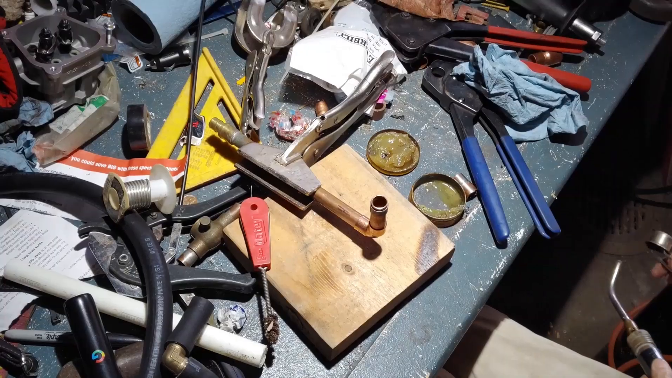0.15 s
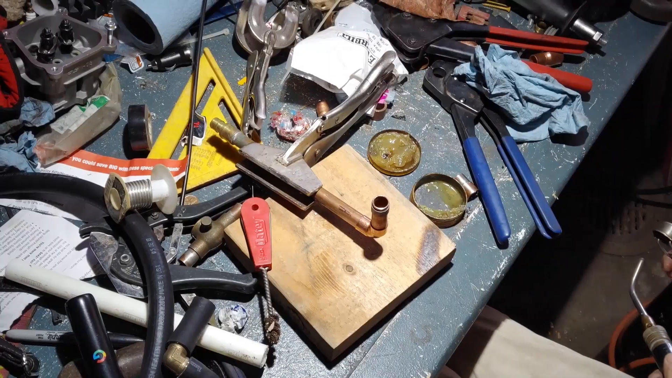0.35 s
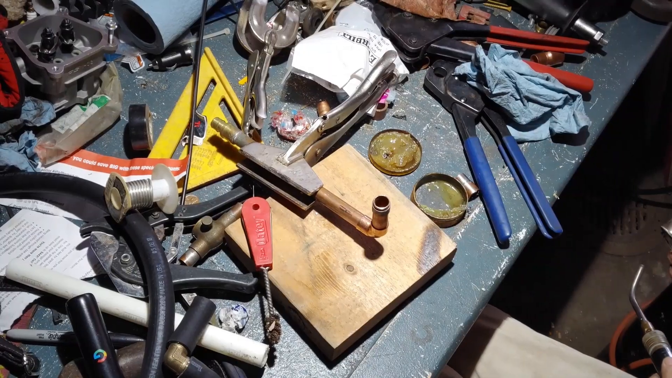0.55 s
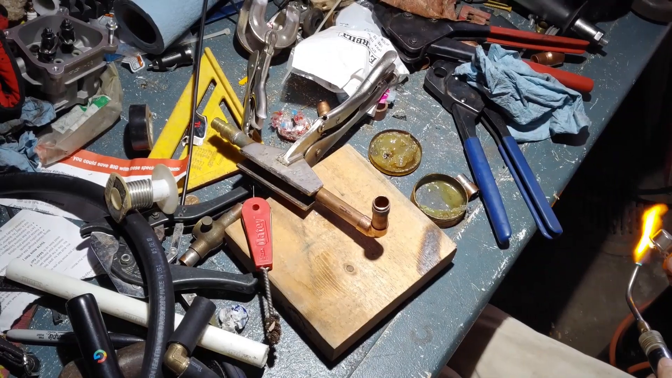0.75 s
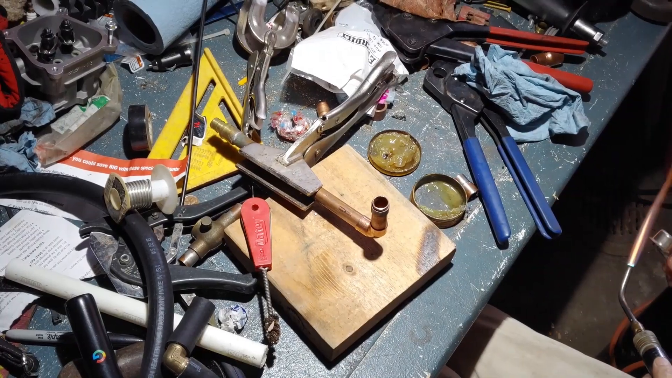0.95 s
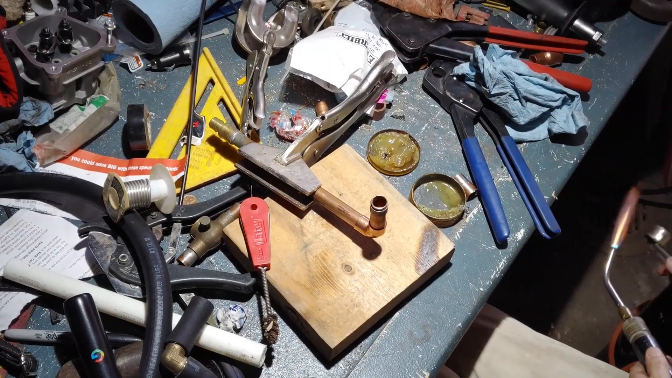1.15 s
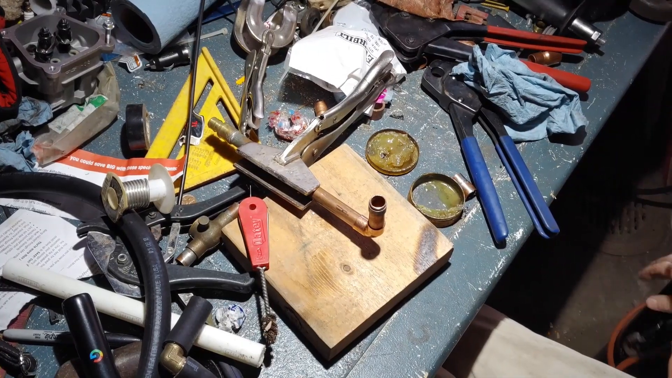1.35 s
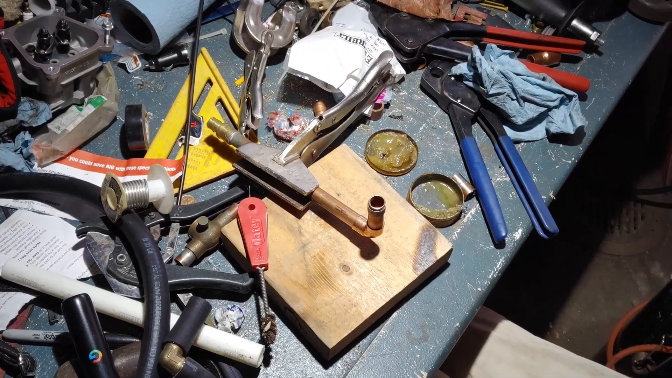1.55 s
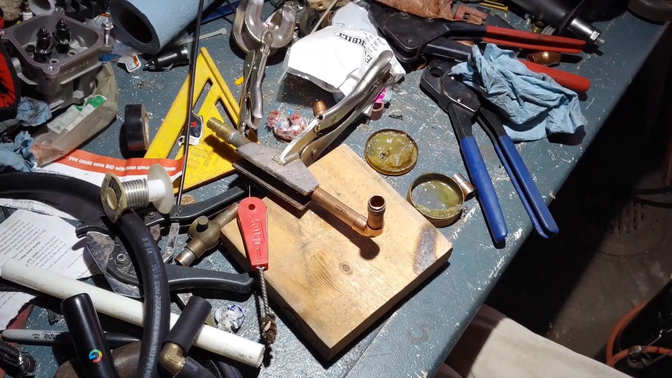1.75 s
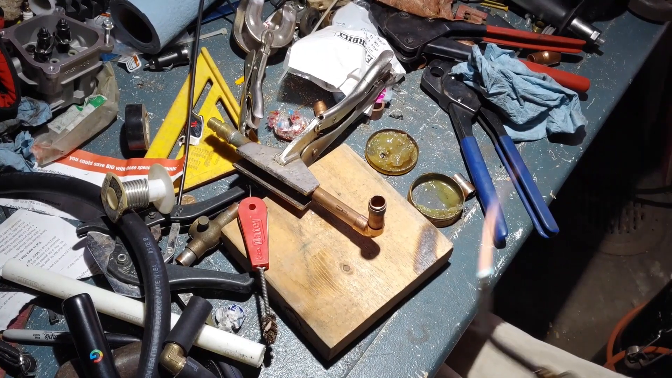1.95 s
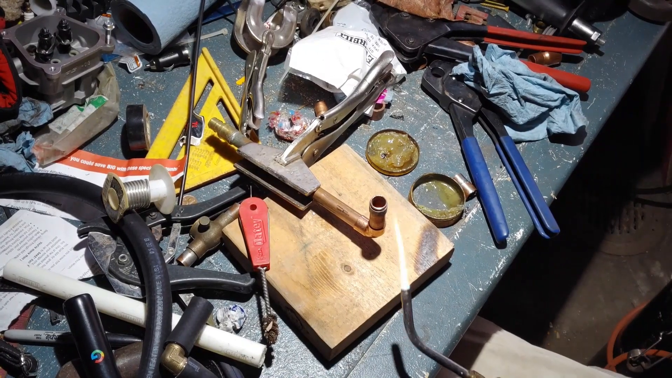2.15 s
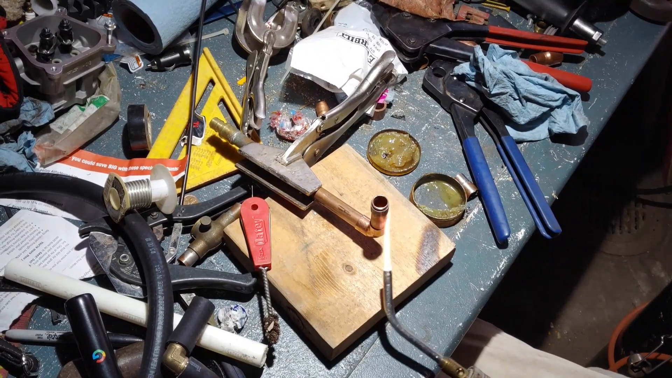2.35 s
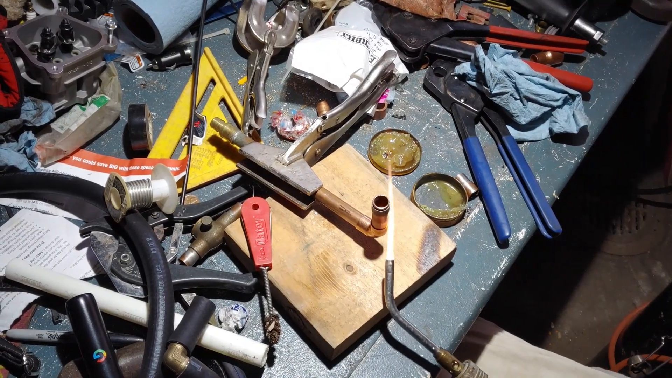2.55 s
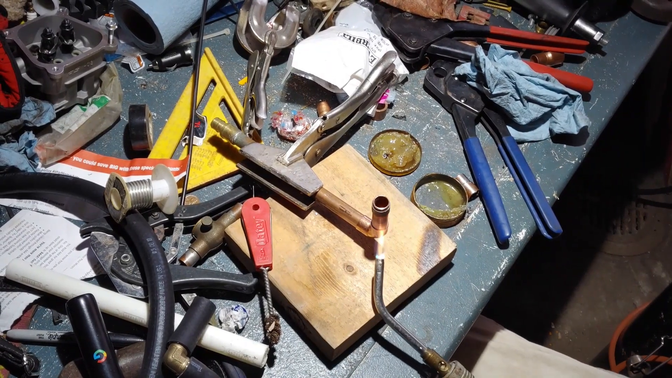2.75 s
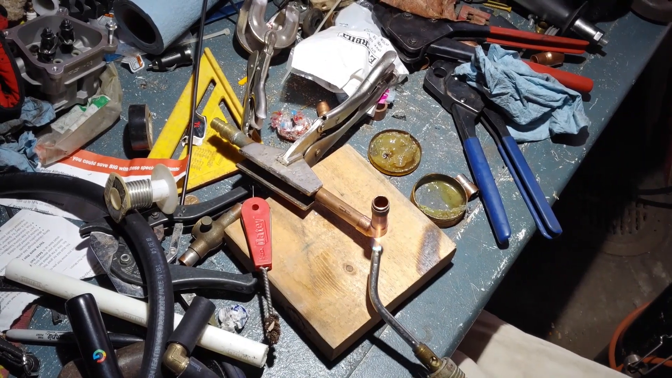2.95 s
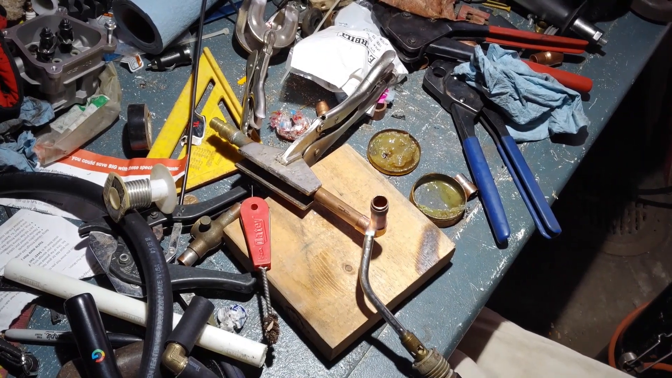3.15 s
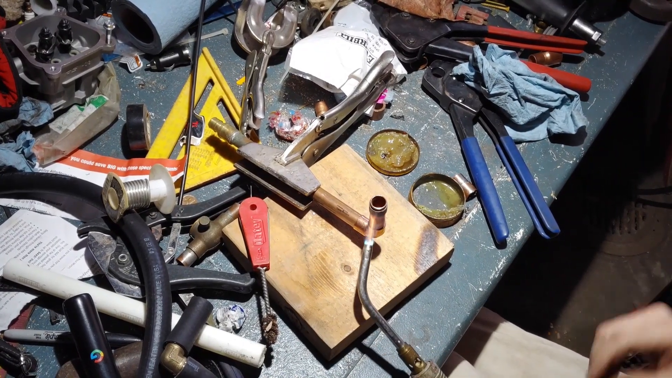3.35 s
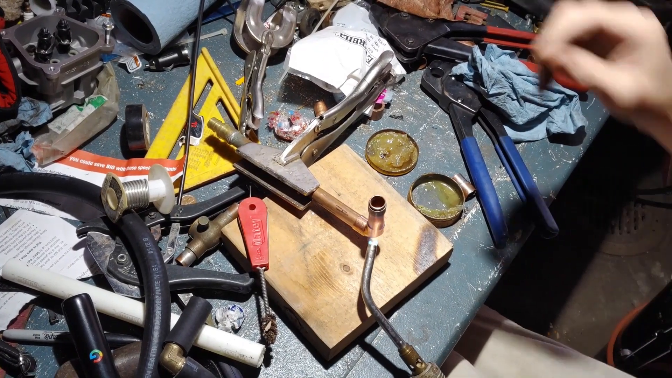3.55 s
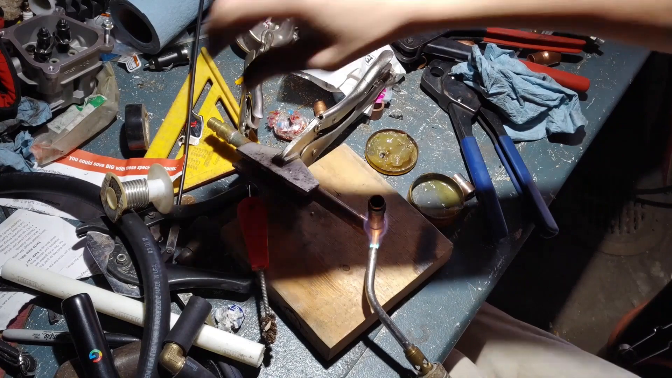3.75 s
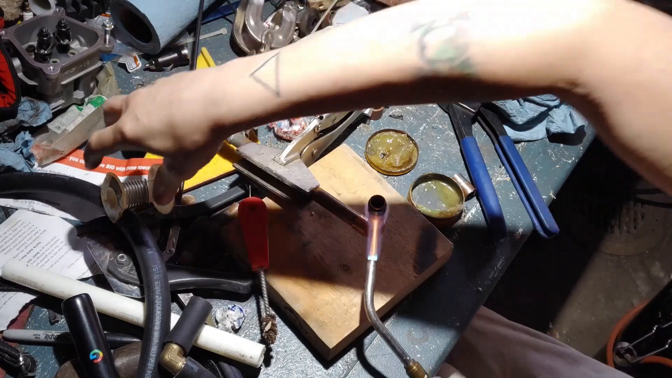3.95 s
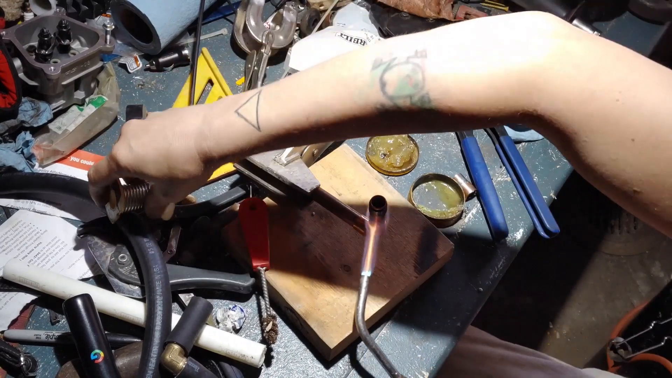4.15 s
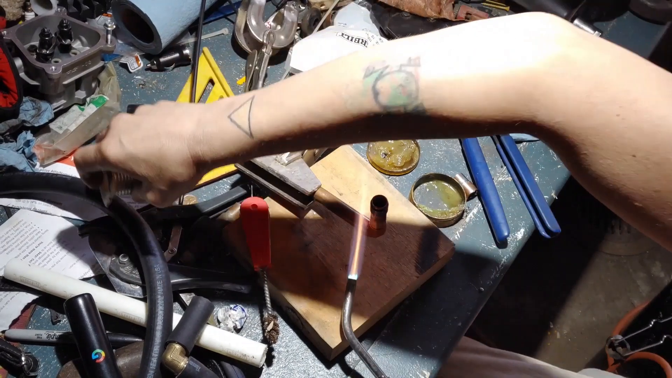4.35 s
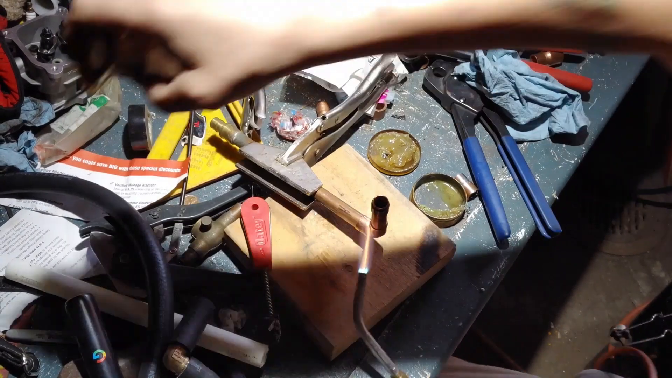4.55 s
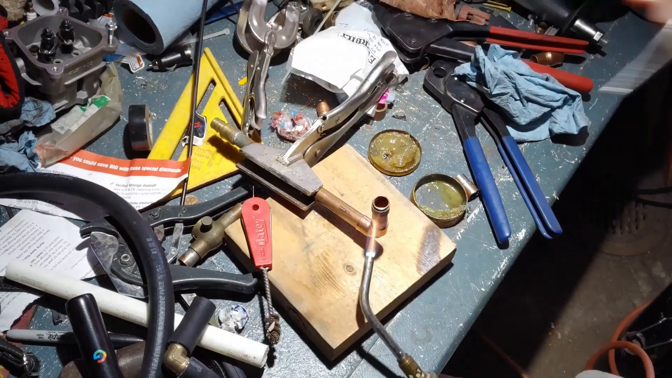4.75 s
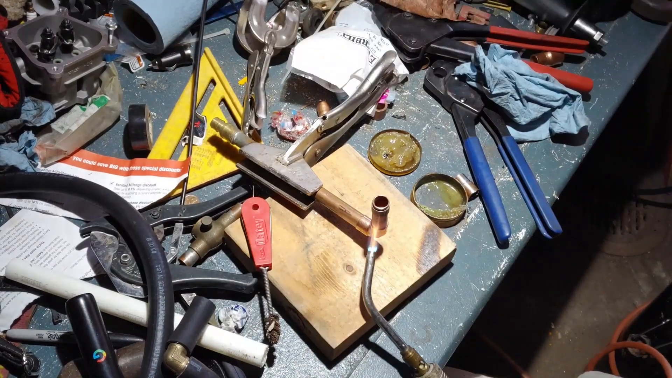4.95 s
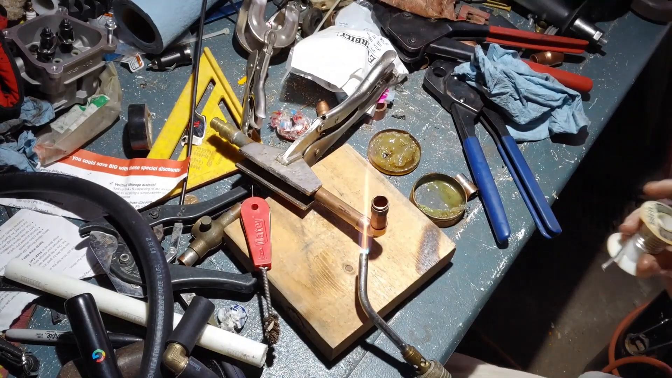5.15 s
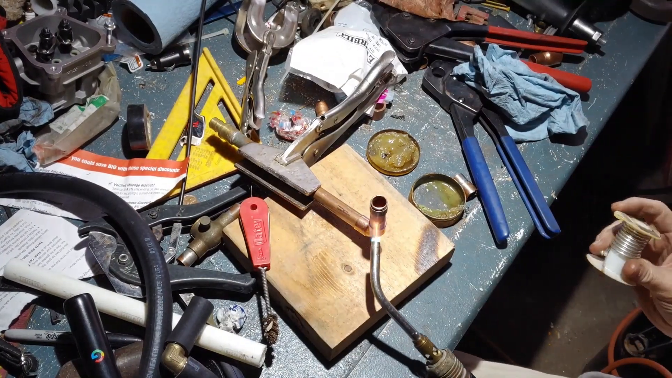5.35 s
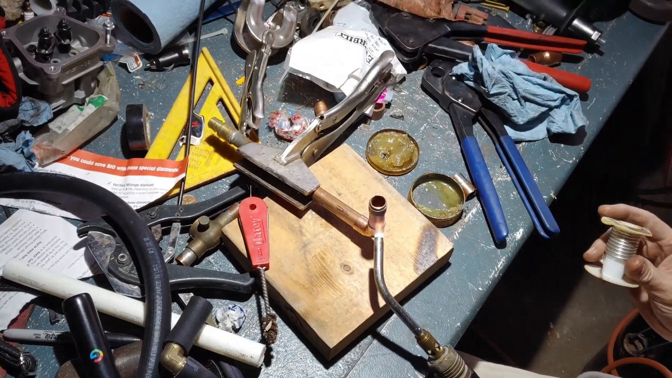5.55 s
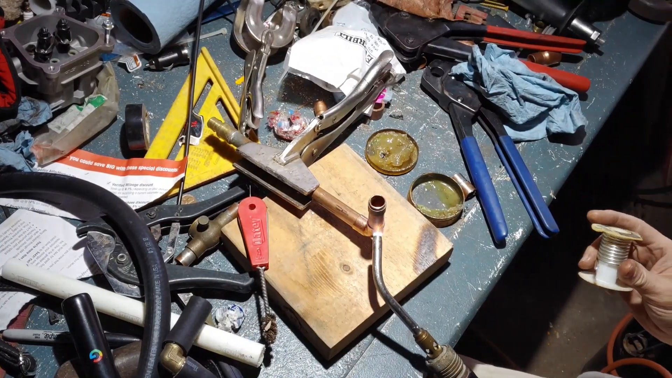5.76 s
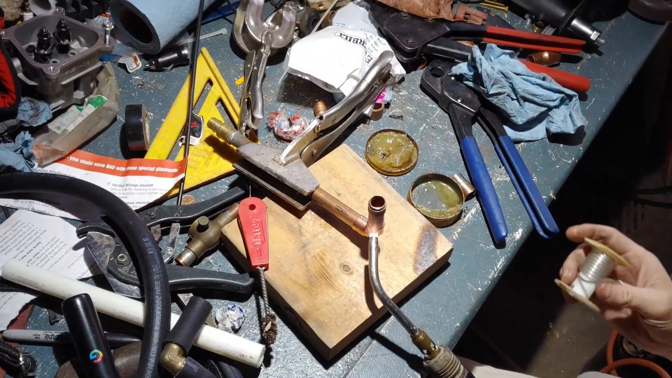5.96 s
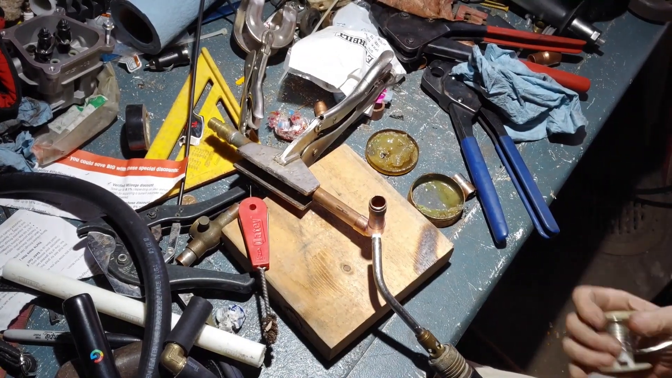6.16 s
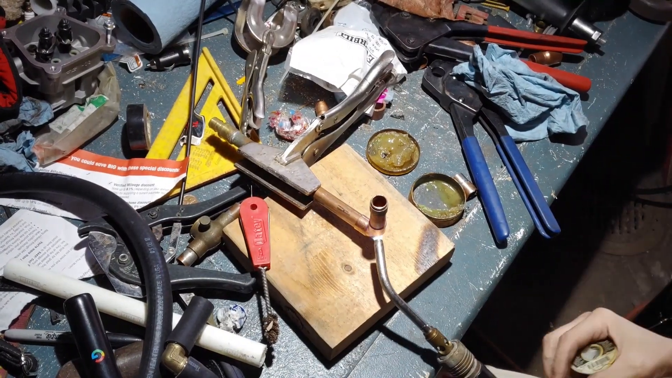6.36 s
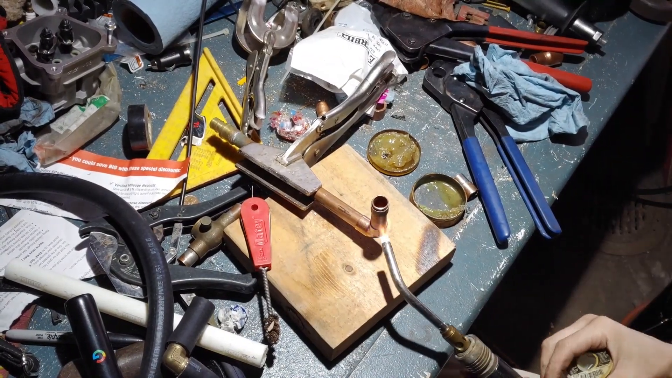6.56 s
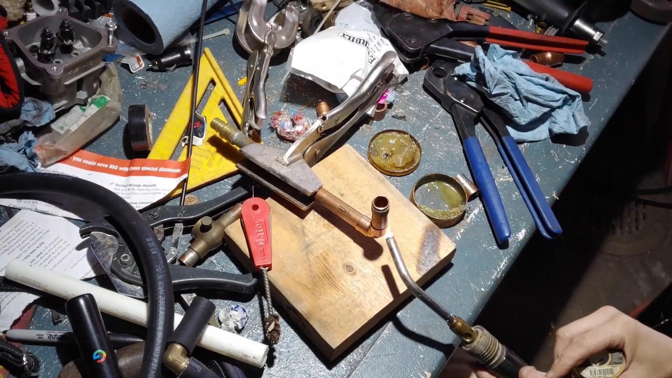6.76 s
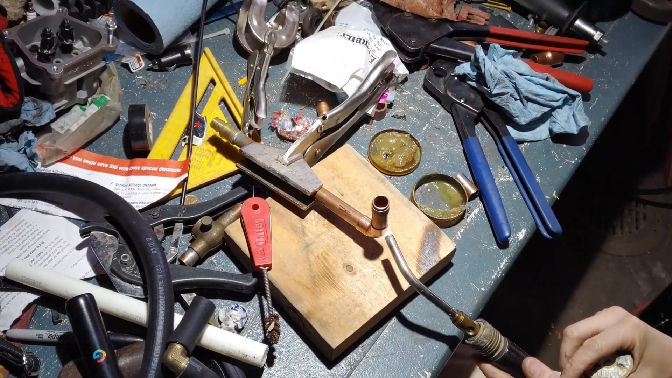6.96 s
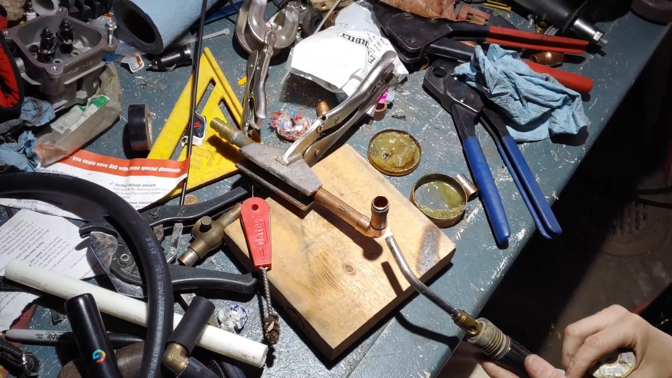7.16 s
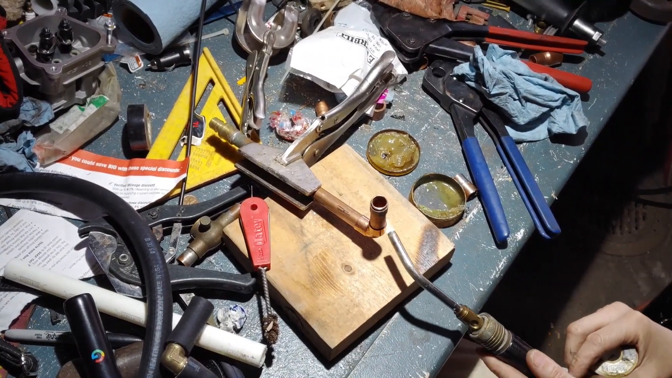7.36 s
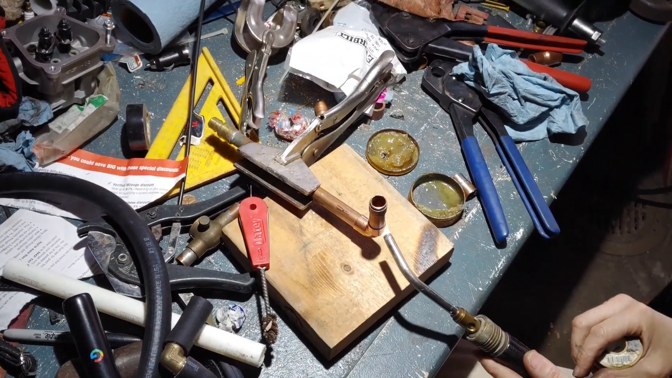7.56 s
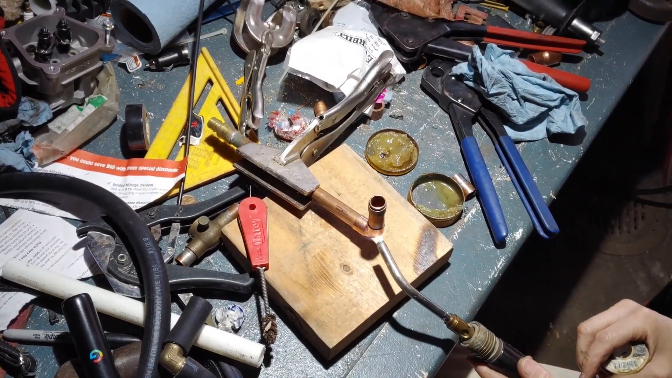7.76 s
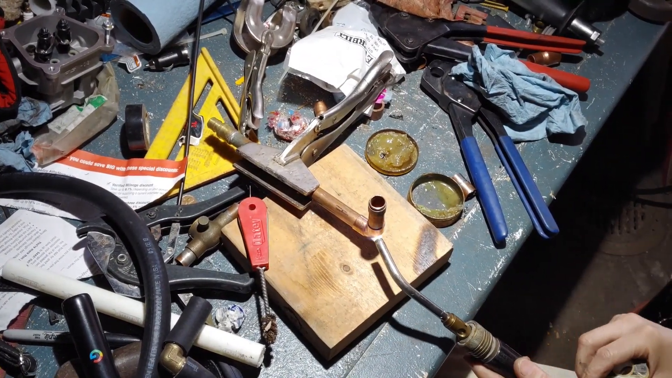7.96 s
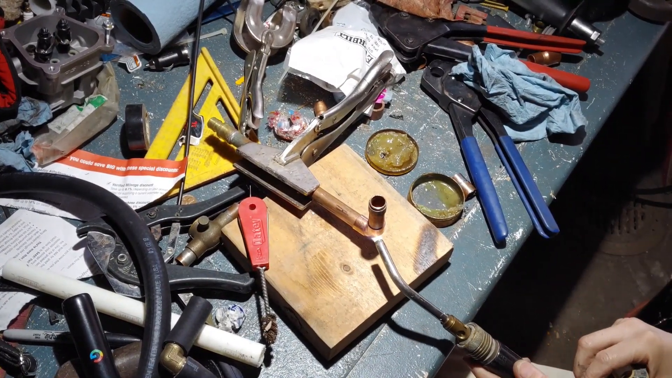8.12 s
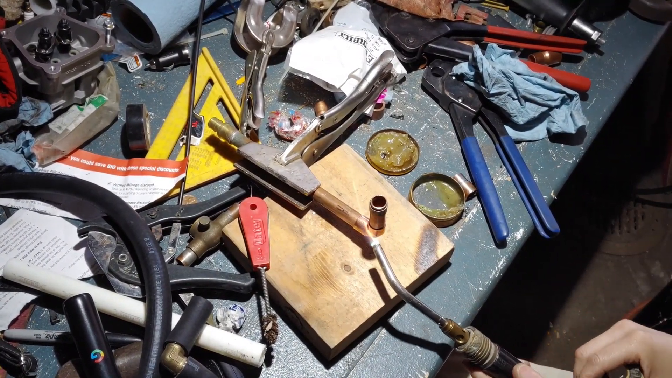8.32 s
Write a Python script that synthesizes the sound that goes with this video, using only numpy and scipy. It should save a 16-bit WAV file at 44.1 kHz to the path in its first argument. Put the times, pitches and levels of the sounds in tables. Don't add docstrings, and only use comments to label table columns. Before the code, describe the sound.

A quiet workshop hums faintly while unlit gas whispers from a hand torch, rising around 0.66 seconds with faint striker touches. At 0.8 a bright metal rasp and gas surge lead into a sharp ignition pop at 0.83, with a low whoosh and short room ring. The young flame hisses leftward, singing in wavering bursts near 2.6 kHz until about 2.4; a metal tick comes at 1.4 and small valve squeaks around 1.3 and 1.5 to 1.7. From 1.8 the torch swings inward, its hiss swelling and shifting in colour. By 3 it is a strong, steady, grainy roar on a copper fitting, with a breathy whistle near 4.3 kHz. A quick double wooden knock lands at 4.4, a bright wire rasp at 4.73, and a soft spool tap at 5.02. The roar continues, gently fluctuating as the nozzle moves, easing near 7 and strengthening until the end at 8.5. Close stereo pickup.

```python
import sys
import numpy as np
from scipy import signal
from scipy.fft import rfft, irfft, next_fast_len
from scipy.io import wavfile
from scipy.ndimage import uniform_filter1d, map_coordinates

SR = 44100
rng = np.random.default_rng(int(sys.argv[2]) if len(sys.argv) > 2 else 0)


def waveform_to_disk(signal):
    frames = np.transpose(np.atleast_2d(signal))
    scaled = np.clip(frames, -1, 1) * 32767
    samples = np.round(scaled).astype(np.int16)
    wavfile.write(sys.argv[1], SR, samples)


def volts_from_db(level):
    exponent = np.asarray(level, float) / 20
    return 10 ** exponent


N = 374409
T = np.arange(N) / SR


def level(x, db):
    return x * volts_from_db(db) / np.sqrt(np.mean(x ** 2))


def left_right(left_db, right_db):
    return volts_from_db(np.array([[left_db], [right_db]]))


def bell(at, middle, half):
    return np.exp(-((at - middle) / half) ** 2)


def curve(table, at):
    s, *columns = np.transpose(table)
    return [np.interp(at, s, column) for column in columns]


def on_log(table, hz):
    f, db = np.transpose(table)
    return np.interp(np.log(hz + 1), np.log(f), db)


def colour(x, table):
    size = next_fast_len(N)
    gain = volts_from_db(on_log(table, np.fft.rfftfreq(size, 1 / SR)))
    return irfft(rfft(x, size) * gain, size)[..., :N]


def resonate(x, peaks):
    return sum(volts_from_db(db) * np.sqrt(100 / w) * signal.lfilter(*signal.iirpeak(f, f / w, SR), x) for f, w, db in peaks)


def walk(rows, steps, hold, neighbours=1):
    x = uniform_filter1d(rng.standard_normal((rows, steps)), max(int(neighbours), 1), axis=0)
    for _ in range(2):
        x = uniform_filter1d(x, max(int(hold), 1))
    return x / x.std()


def ring(start, modes, share, push_s):
    out, near = np.zeros(N), slice(int(start * SR) - 2000, int(start * SR) + SR // 2)
    age = T[near] - start
    rise = np.exp(-(np.minimum(age, 0) / push_s) ** 2)
    tones = 0
    for f, db, t60 in modes:
        fade = volts_from_db(db - 60 * np.maximum(age, 0) / (t60 * share))
        tones = tones + fade * np.cos(2 * np.pi * f * age)
    out[near] = rise * tones
    return out / np.sum(volts_from_db(np.array(modes)[:, 1]))


def room(x, t60, db):
    age = np.arange(SR // 2) / SR
    tail = rng.standard_normal((2, len(age))) * volts_from_db(-60 * age / t60) * (age > .006)
    tail = tail / np.sqrt(np.sum(tail ** 2) / 2)
    return volts_from_db(db) * signal.fftconvolve(x[None], tail, axes=1)[:, :N]


def small(x):
    return signal.sosfiltfilt(signal.butter(2, 165, "high", fs=SR, output="sos"), x)


# f/Hz, level/dB [dB per Hz]
AIR_COLOUR = [(15, -37), (25, -15), (64, -8), (175, -16), (240, -4), (400, -9.5), (1000, -18.5),
              (2000, -26), (3200, -26), (6000, -27.5), (9000, -26), (12000, -24.5), (16000, -32.5)]


def shop():
    mid, side = colour(rng.standard_normal((2, N)), AIR_COLOUR)
    side = colour(side, [(30, 2), (80, -6), (250, -5), (700, 1.5)])
    air = level(np.array([mid + side, mid - side]) * volts_from_db(1.4 * walk(1, N, 2000)), -60.5)
    hum = level(resonate(rng.standard_normal(N), [(251.4, 25, 0)]), -65.5)
    return air * left_right(1.1, -1.1) + hum


# f/Hz, width [Hz], level/dB
LEAK_TONES = [(4130, 150, -4), (5450, 150, -10), (6780, 130, 3), (7950, 200, -6)]
# t/s, level/dB
LEAK_LEVEL = [
    (0.03, -59.5),
    (0.2, -60.5),
    (0.55, -62.5),
    (0.66, -56),
    (0.79, -58.5),
    (0.8, -46),
]


def leak():
    fits = walk(len(LEAK_TONES), N // 100 + 1, 14).repeat(100, axis=1)[:, :N]
    hiss = 0
    for fit, (f, width_hz, db) in zip(fits, LEAK_TONES):
        broad = resonate(rng.standard_normal((2, N)), [(f, 3 * width_hz, 0)])
        hiss = hiss + volts_from_db(3.8 * fit) * resonate(broad, [(f, width_hz, db)])
    return level(hiss, 0) * volts_from_db(curve(LEAK_LEVEL, T)[0]) * left_right(2.5, -1.5) * (T < .805)


# f/Hz, level/dB, time to fade by 60 dB [s]
BENCH_TONES = [(258, 0, 0.2), (141, -4, 0.13), (309, -2, .09), (416, -8, .09), (512, 0, 0.13),
               (630, -5.5, .06), (955, -3, 0.044), (1290, -3, .03)]
# t/s, level/dB, ring length [share], main tone's extra level/dB, softness [dB per octave]
BENCH_KNOCKS = [
    (4.3878, -12, 0.98, 5, -1.5),
    (4.398, -14, 0.3, -1, 3),
    (4.421, -26.5, 1, 14, 5),
    (0.64, -43, .8, -8, 9),
    (0.6, -47, .4, .5, 6),
    (4.3853, -21, .3, -2, -4),
    (4.43, -28, .6, 8, 0),
]
# f/Hz, level/dB, time to fade by 60 dB [s]
SPOOL_TONES = [(350, 1, 0.063), (415, -1, 0.073), (262, -6, 0.11), (556, -9, .04), (169, -17, .06)]
# t/s, level/dB, ring length [share]
PALM_TAPS = [
    (5.0178, -24.5, 1.3),
    (5.0232, -35, .6),
]


def knocks():
    (deep_hz, deep_db, deep_t60), *upper = BENCH_TONES

    def struck(extra_db, dull_db):
        softened = [(f, db - dull_db * abs(np.log2(f / 380)), t60) for f, db, t60 in upper]
        return [(deep_hz, deep_db + extra_db, deep_t60)] + softened

    bench = small(sum(volts_from_db(db) * ring(s, struck(*touch), share, .0013) for s, db, share, *touch in BENCH_KNOCKS))
    spool = sum(volts_from_db(db) * ring(s, SPOOL_TONES, share, 0.0022) for s, db, share in PALM_TAPS)
    both = bench + spool
    return both * left_right(.7, -.7) + room(both, .2, -14)


SCRAPE_TIMES = [.676, .678, .7995, .803, .833, 1.425, 4.735, 4.733, 4.735, 4.72]
# peak level/dB, f/Hz, width [Hz], length [s], left minus right level/dB
METAL_SCRAPES = [
    (-53, 3420, 60, 0.0065, 6),
    (-55.5, 6500, 6000, 0.013, 13),
    (-41, 8200, 760, 0.0036, 15),
    (-40.5, 4300, 3000, 0.005, 0),
    (-33, 9300, 9000, .003, 6),
    (-39, 6500, 5600, .006, 3),
    (-27, 8800, 200, 0.012, 15),
    (-43, 11000, 630, 0.0069, 2),
    (-39, 15000, 900, .012, -2),
    (-30, 12000, 8800, .02, 10),
]


def scrapes():
    out, rub = np.zeros((2, N)), rng.standard_normal(N)
    for s, (db, hz, width_hz, length, pan_db) in zip(SCRAPE_TIMES, METAL_SCRAPES):
        near = slice(int(s * SR) - SR // 10, int(s * SR) + SR // 10)
        burst = level(resonate(rub[near], [(hz, width_hz, 0)]), db - 6.5) * bell(T[near], s, length)
        out[:, near] += burst * left_right(pan_db / 2, -pan_db / 2)
    return out


# t/s, lead of the left port [ms]
LEFT_LEAD = [
    (.8, 0.25),
    (1.3, 0.24),
    (1.8, 0.35),
    (2.15, 0.097),
    (4.4, 0.077),
    (4.8, 0.076),
    (8.49, 0.083),
]


def ports(x):
    lag = curve(LEFT_LEAD, T)[0] * SR / 1000
    return np.array([map_coordinates(x, [np.arange(N) + side * lag / 2], order=3, mode="nearest") for side in (1, -1)])


# delay [ms], gain [ratio]
BENCH_ECHOES = [(1.0, 0.14), (1.75, 0.0056), (2.05, -0.053), (4.2, -0.0083), (4.5, -0.15), (8.75, 0.23)]


def tube(x):
    size = next_fast_len(N)
    hz = np.fft.rfftfreq(size, 1 / SR)
    dull = 1 / (1 + (hz / 5800) ** 4)
    inside = 1 / (1.5 - 0.2632 * dull * np.exp(-2j * np.pi * hz / 1370))
    outside = 1 + dull * sum(g * np.exp(-2j * np.pi * hz * ms / 1000) for ms, g in BENCH_ECHOES)
    return irfft(rfft(x, size) * inside * outside, size)[:, :N]


# t/s, loudness level/dB as the torch nears, raggedness level/dB
FLAME_COURSE = [(.8, -54, -5), (.845, -48.5, 7), (.9, -39.5, -3), (.96, -43.5, 6), (1.07, -42.5, 0),
                (1.62, -45.5, 3.5), (1.94, -37.5, 2.5), (2.15, -36, -1), (2.47, -39, -4.5), (2.76, -36, -3),
                (3.03, -32, -5), (3.8, -32.5, -2), (4.35, -32, 1.5), (4.65, -32, 1.5), (4.95, -31.5, -3.5),
                (5.85, -32, -5.5), (7.0, -34, -3), (8.49, -31.5, -4)]
NEAR_DB = -32
# level/dB when near, dB per dB of loudness, dB per dB of raggedness
BAND_LEVELS = [
    (-36.5, 0.91, 0.89),
    (-50, 2, 0.2),
    (-31.5, 1.04, 0.11),
    (-42, 0.93, 0.1),
]
# t/s, half length [s], level/dB
WRIST_TURNS = [(7.57, 0.045, 2), (1.3, .25, -0.5), (2.142, .04, -4.5), (2.386, .07, 3.5), (2.72, 0.073, -5),
               (3.053, 0.1, 0.5), (3.647, 0.13, 3), (4.298, 0.41, -2), (5.552, .12, -2), (6.054, 0.099, 0),
               (6.58, 0.072, 3.5), (7.33, 0.14, -2.5), (7.668, 0.043, -7), (7.97, 0.095, 2.5)]
AIM_SHARES = [0.48, 0.12, 0.32, 0.86]
# t/s, half length [s], left minus right level/dB
BODY_SWAYS = [
    (.25, .4, 1),
    (1.0, 0.21, 0.5),
    (3.1, .3, -0.5),
    (4.3, .25, 0.5),
    (5.2, .3, 0),
    (6.2, .25, 0.6),
    (6.7, .25, -.4),
    (8.2, 0.27, -1),
]


def torch(at):
    loud_db, ragged_db = curve(FLAME_COURSE, at)
    flare = bell(at, 0.834, np.where(at < 0.834, .014, 0.053))
    flare_db = [7.7, 33, .1, 3.5]
    aim_db = sum(db * bell(at, s, half) for s, half, db in WRIST_TURNS)
    bands = []
    for (near, slope, share), extra, beam in zip(BAND_LEVELS, flare_db, AIM_SHARES):
        bands.append(near + slope * (loud_db - NEAR_DB) + share * ragged_db + extra * flare + beam * aim_db)
    pan_db = 16.5 * (curve(LEFT_LEAD, at)[0] - 0.096)
    return bands, pan_db + sum(db * bell(at, s, half) for s, half, db in BODY_SWAYS)


# t/s, half length [s], f/Hz, half
# width [Hz], level/dB
ARM_SHADES = [(1.24, 1, 3930, 630, -2.5), (1.5, 0.16, 2940, 130, 10.5), (2.66, 0.19, 3220, 300, -12),
              (2.57, .18, 7000, 1500, -2.5), (2.77, .12, 14000, 2000, -3), (2.29, 0.14, 1130, 280, -7),
              (2.8, 0.35, 1350, 100, 14), (2.86, 0.13, 2370, 290, 7.5), (3.39, 0.34, 3230, 460, 7),
              (3.8, 1.14, 1455, 154, -15), (4.11, 0.24, 2960, 140, 8), (4.56, 0.18, 2400, 320, 5),
              (4.3, 0.045, 2400, 82, 9), (1.07, .07, 4800, 530, 3.5), (0.935, .08, 4000, 640, -6),
              (1.43, 0.34, 1290, 100, 12), (4.46, 0.27, 3680, 700, -9), (4.1, 0.17, 6500, 1200, 3),
              (5.42, 0.15, 1340, 280, -3), (4.62, 0.23, 11600, 350, 8.5), (5.53, 0.2, 3160, 200, 6),
              (7.7, 0.66, 1470, 210, 7), (6.85, 0.65, 2860, 160, -9), (7.4, 0.37, 3650, 150, 6),
              (5.1, 0.38, 4000, 440, 2), (5.5, 0.7, 5200, 450, -2), (7.8, .15, 4600, 500, 0.5),
              (6.05, .15, 5100, 300, -3), (1.43, .09, 3030, 60, 4), (2, .08, 2950, 150, 10),
              (2.12, 0.05, 3700, 110, 12), (3.46, 0.34, 680, 80, 5), (6.4, 0.17, 660, 110, 6.5),
              (6.3, 0.069, 500, 130, 4.5), (2.27, 0.093, 490, 150, 11), (3.96, 0.18, 330, 60, 8),
              (5.1, .15, 1400, 240, -0.5), (2.1, 0.14, 1450, 150, 3.5), (7.2, 2.6, 1750, 85, -4.5),
              (5.98, .11, 2700, 130, -8)]
# t/s, half length [s], f/Hz, half width [Hz], level/dB
HAND_GLIMPSES = [(2.86, .06, 4030, 100, 8), (2.5, .05, 4170, 100, 6), (2.6, .17, 3550, 200, -5),
                 (2.2, .12, 3200, 350, 0), (.9, .05, 550, 200, 3), (4.4, 0.084, 3900, 500, 2),
                 (3.54, 0.33, 4000, 90, 6), (7.8, .15, 4400, 400, 1), (2.62, .14, 3000, 250, -6),
                 (3.0, 0.11, 4200, 400, 1), (5.4, .12, 3700, 300, -0.5), (3.7, 0.17, 3200, 400, -1.5),
                 (4.75, .1, 2300, 400, -0.5), (6.0, .1, 1050, 100, 2), (6.8, .12, 500, 120, 7.5),
                 (5.3, 0.11, 670, 120, 6), (7.9, 0.078, 680, 110, 3.5), (1.4, .4, 270, 90, -6),
                 (5.98, .11, 2700, 130, -10), (1.04, .06, 3300, 200, -8), (2.28, .07, 3300, 120, -8),
                 (2.46, .05, 2800, 120, -6), (1.74, .25, 2140, 120, -7), (3.75, .06, 11600, 900, -1),
                 (5.9, .04, 9500, 1200, 5), (3.1, .12, 11550, 200, 3)]
# t/s, f/Hz, climb [Hz per s], level/dB
CLIMBS = [
    (2.164, 1630, 760, 8.5),
    (3.2, 9460, 150, 5),
    (6, 11700, 760, 6.5),
    (5.75, 10400, 1500, 3.5),
    (8.1, 2930, 100, -8),
    (6.6, 1440, 30, 6.5),
]


def shades(hz, s):
    mid, half, f, width_hz, db = np.transpose(ARM_SHADES[:-1] + HAND_GLIMPSES)[:, :, None]
    total = (db * np.exp(-((hz - f) / width_hz) ** 2)).T @ np.exp(-((s - mid) / half) ** 4)
    for mid, f, glide, db in CLIMBS:
        off_hz = hz[:, None] - f - glide * (s - mid)
        total = total + db * np.exp(-((s - mid) / 0.48) ** 4 - (off_hz / (60 + 0.022 * f)) ** 2)
    return total


# low f/Hz, high f/Hz
BAND_EDGES = [(1100, 3000), (450, 1000), (3300, 6500), (7500, 15000)]
# f/Hz, level/dB [dB per Hz]
BURN_COLOUR = [(90, -70), (150, -28), (210, -36.5), (280, -24), (570, -16.5), (940, -8), (1120, -14.5),
               (1360, -7), (1790, -7), (2400, -6.5), (2870, -12.5), (3300, -8.5), (4000, -5), (4400, -4),
               (4580, -9), (4900, -9.5), (5200, -10), (5900, -9.5), (6300, -9), (7250, -10.5),
               (7850, -18.5), (8600, -14), (9300, -12), (9800, -14), (11500, -14.5), (12500, -18.5),
               (14300, -21.5), (15600, -21.5)]
# f/Hz, left minus right level/dB
PORT_BALANCE = [(60, -3), (110, 9), (200, 2), (380, 0.5), (700, 2), (1290, 2), (2380, 0), (4400, -1.5),
                (8120, 3.5), (15000, 12.5)]
# f/Hz, scattered minus direct level/dB
SCATTER_COLOUR = [(200, -9), (500, -3.5), (1000, .5), (2000, -3.5), (4000, -7.5), (8000, -1), (14000, 1)]


def flame():
    grain = volts_from_db(0.71 * walk(1, N, 7.7)[0])
    burn = grain * rng.standard_normal(N)
    clutter = room(burn, .07, -6) + volts_from_db(-1) * rng.standard_normal((2, N))
    jet = tube(ports(burn) + colour(clutter, SCATTER_COLOUR))
    hz, s, z = signal.stft(colour(jet, BURN_COLOUR), SR, nperseg=256)
    band_db, pan_db = torch(s)
    power = np.mean(np.abs(z.mean(axis=0)) ** 2, axis=1) * 4 / 3
    now_db = [10 * np.log10(power[(hz > lo) & (hz < hi)].sum()) for lo, hi in BAND_EDGES]
    centre = np.log(np.sqrt(np.prod(BAND_EDGES, axis=1)))
    rank = np.argsort(centre)
    shares = np.array([np.interp(np.log(hz + 1), centre[rank], rank == k) for k in range(len(rank))])
    db = shares.T @ (np.array(band_db) - np.array(now_db)[:, None])
    db = db + shades(hz, s) + 0.45 * walk(1, len(s), 24)
    db = db + 1.39 * walk(len(hz), len(s), 17.3, 3) + 0.97 * walk(len(hz), len(s), 6, 25)
    side_db = (pan_db + on_log(PORT_BALANCE, hz)[:, None]) / 2
    db = db + np.array([1, -1])[:, None, None] * side_db
    hz, s, z = signal.stft(signal.istft(z * volts_from_db(db), SR, nperseg=256)[1], nperseg=1024)
    eddies_db = 2.26 * walk(len(hz), len(s), 3, 2)
    return signal.istft(z * volts_from_db(eddies_db - .5), nperseg=1024)[1][:, :N]


CAVITY_HZ = [4326, 4062, 3885, 3670, 3400, 3170, 5470, 940, 1390]
# width [Hz], level/dB
CAVITIES = [(55, 0), (79.6, -6.5), (60, -10), (55, -7.5), (50, -12), (55, -10.5), (70, -19), (85.7, -18),
            (150, -18)]
# t/s, pitch shift [share]
CAVITY_WARMING = [
    (2.8, -.075),
    (3.05, -.015),
    (3.3, -.002),
    (4.6, 0),
    (4.75, -.007),
    (5.3, -.007),
    (6.8, .001),
    (8.49, .003),
]


def fitting():
    breath_db = -39.5 + (curve(FLAME_COURSE, T)[0] - NEAR_DB) + 1.6 * walk(1, N, 3000)
    breath = rng.standard_normal((3, N)) * volts_from_db(breath_db)
    heard = ports(breath[0]) + volts_from_db(-5) * breath[1:]
    out = 0
    for hz, (width_hz, db) in zip(CAVITY_HZ, CAVITIES):
        steep = signal.iirpeak(hz, hz / (1.5 * width_hz), SR)
        tone = signal.lfilter(*steep, signal.lfilter(*steep, heard))
        if hz == CAVITY_HZ[0]:
            place = np.arange(N) + np.cumsum(curve(CAVITY_WARMING, T)[0] * (T > 2.7))
            tone = np.array([map_coordinates(port, [place], order=1, mode="mirror") for port in tone])
        else:
            db = db - 7 * uniform_filter1d(1. * (T > 4.2) * (T < 4.69), size=700)
        out = out + volts_from_db(db + 1.6 * walk(1, N, 1200)) * tone
    away_db = np.interp(T, [2.35, 2.45, 2.76, 2.98], [-11, -13, -13, 0])
    return out * volts_from_db(31 + away_db)


# f/Hz, level/dB, time to fade by 60 dB [s]
POP_TONES = [(259, 1, 0.23), (319, 1.5, 0.22), (387, -4, 0.23), (436, -13, 0.18), (558, -7.5, 0.21),
             (610, -14, 0.25), (694, -10.5, .17), (800, -15, 0.22), (970, -31, 0.061), (1360, -9, 0.07),
             (1250, -28, 0.17), (2430, -21, .1)]
# t/s, level/dB, ring length [share]
POP_BOUNCES = [
    (0.841, -13, .12),
    (.8522, -15, .12),
    (.8465, -20, .12),
    (.8675, -20, .12),
    (.881, -21, .12),
]
# t/s, f/Hz, level/dB, time to fade by 60 dB [s]
TOOL_PINGS = [
    (.844, 1820, -29, .06),
    (.866, 1790, -37, .08),
    (.862, 1280, -35, .08),
    (.96, 1360, -42, .1),
    (.988, 1370, -42, .1),
    (4.432, 950, -32.5, .08),
]


def pop():
    start, db = .8338, -3.5
    kick = volts_from_db(db) * ring(start, POP_TONES, .15, .002)
    body = volts_from_db(db - 4.5) * ring(start, POP_TONES, 0.99, 0.0033)
    whoosh = resonate(rng.standard_normal(N), [(372, 170, 10.0), (1490, 2000, -28)])
    whoosh *= volts_from_db(-12 - 3000 * np.maximum(start - T, 0) - 400 * np.maximum(T - start, 0)) * (T > .8)
    thump = volts_from_db(-30) * ring(start, [(62, -6, .4), (92.5, 0, 0.27), (125, -6, .3)], 0.9, .004)
    cupboard = volts_from_db(-29) * ring(start, [(140, -14, .2), (202, 0, 0.17)], 1, .003)
    echoes = sum(volts_from_db(db) * ring(s, POP_TONES, share, 0.0011) for s, db, share in POP_BOUNCES)
    pings = sum(volts_from_db(db) * ring(s, [(hz, 0, t60)], 0.68, .003) for s, hz, db, t60 in TOOL_PINGS)
    direct = small(kick + body + echoes + pings) + whoosh
    return direct * left_right(.9, -.9) + thump + cupboard * left_right(4, -5) + room(small(kick), .22, -2.5)


# t/s, half length [s], f/Hz, level/dB
SONG_BURSTS = [(0.844, 0.0077, 2715, -34), (0.865, 0.013, 2715, -25), (0.905, 0.016, 2652, -27),
               (0.943, .01, 2650, -39), (0.961, .006, 2640, -35), (1.008, .02, 2675, -43),
               (1.12, .02, 2620, -46), (1.2, .03, 2630, -45), (1.274, 0.017, 2613, -37),
               (1.414, 0.073, 2625, -47), (1.53, 0.064, 2615, -46), (1.79, .05, 2653, -44.5),
               (1.927, 0.05, 2640, -34.5), (2.0, .05, 2650, -35), (2.103, 0.04, 2600, -36),
               (2.17, .02, 2610, -41), (2.233, 0.02, 2615, -35), (2.306, 0.032, 2610, -39.5),
               (2.372, .02, 2530, -42)]


def singing():
    s, half, pitch, db = np.transpose(SONG_BURSTS)
    waver_hz = np.where(T < 1, 14, 40) * walk(1, N, 200)[0]
    phase = 2 * np.pi * np.cumsum(np.interp(T, s, pitch) + waver_hz) / SR
    near = T[:3 * SR]
    swell = np.pad(volts_from_db(db) @ bell(near, s[:, None], half[:, None]), (0, N - len(near)))
    tone = np.sin(phase) + volts_from_db(-14.5) * np.sin(2 * phase)
    return ports(swell * volts_from_db(3.5 + 1.7 * walk(1, N, 463)[0]) * tone)


# start t/s, end t/s, f/Hz, level/dB
VALVE_CREAKS = [
    (1.546, 1.695, 487, -53.5),
    (1.525, 1.555, 930, -52.5),
    (1.255, 1.31, 355, -59),
    (1.29, 1.335, 515, -61),
]


def creaks():
    out = np.zeros(N)
    for start, end, hz, db in VALVE_CREAKS:
        swell = np.clip((T - start) / (.5 * (end - start)), 0, 1)
        stop = np.clip((end - T) / 0.016, 0, 1)
        out += volts_from_db(db + 4.0) * swell * stop * np.sin(2 * np.pi * hz * T)
    return out


def scene():
    lit = np.clip((T - .797) / 0.0075, 0, 1)
    before = shop() + leak() + knocks() + scrapes()
    return before + lit * (flame() + fitting()) + pop() + singing() + creaks()


def low_pass(x):
    return signal.sosfilt(signal.butter(12, 15880, fs=SR, output="sos"), x)


def record(dry):
    ceiling, top_hz = .78, 15850
    rounded = ceiling * np.tanh(dry / ceiling)
    mix = colour(rounded, [(40, -13), (80, 0), (top_hz, 0), (top_hz + 30, -40), (top_hz + 400, -70)])
    mix = mix * np.clip((T - .017) / 0.0088, .15, 1)
    return low_pass(mix)


dry = scene()
out = record(dry)
waveform_to_disk(out)
```